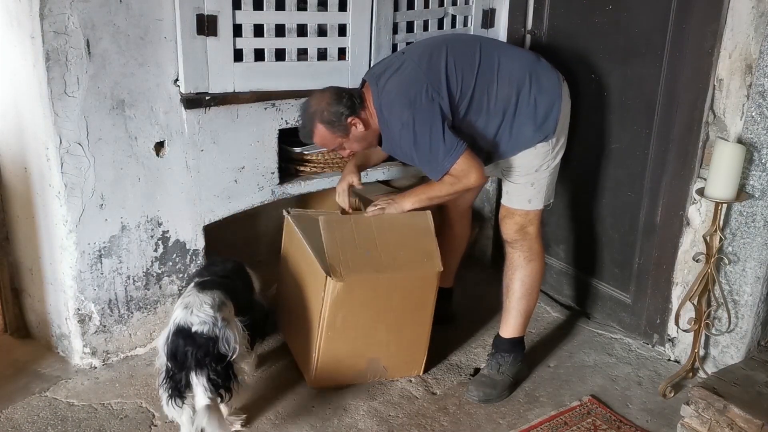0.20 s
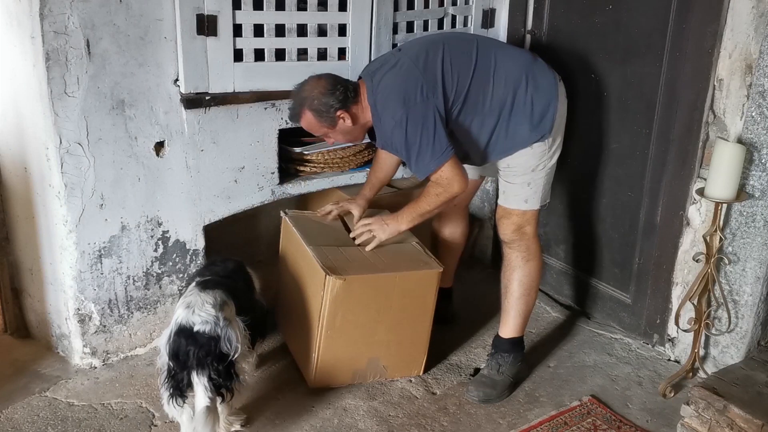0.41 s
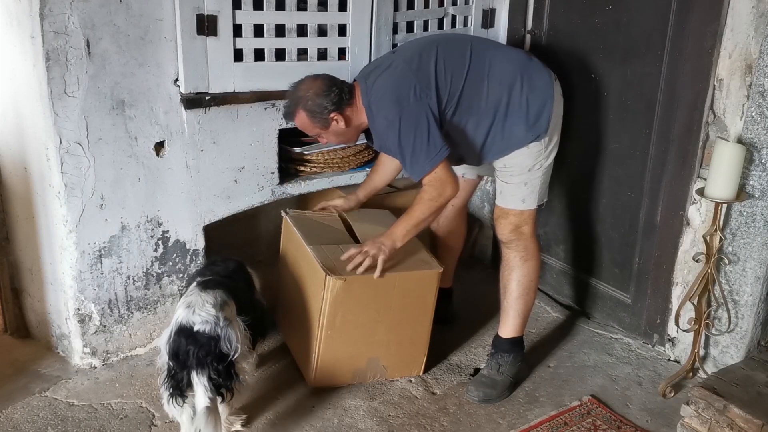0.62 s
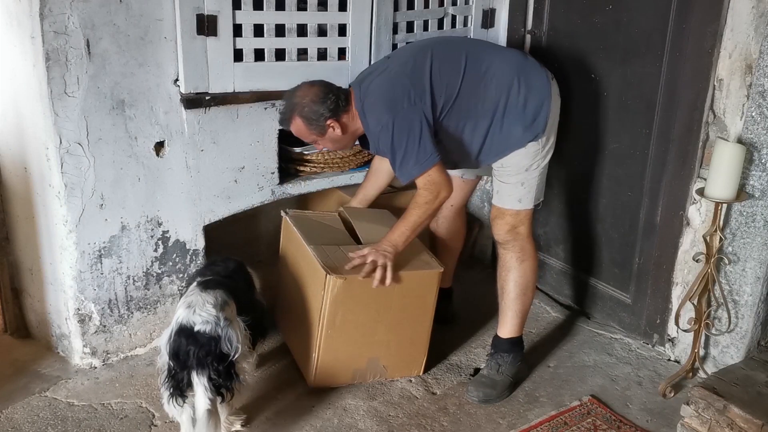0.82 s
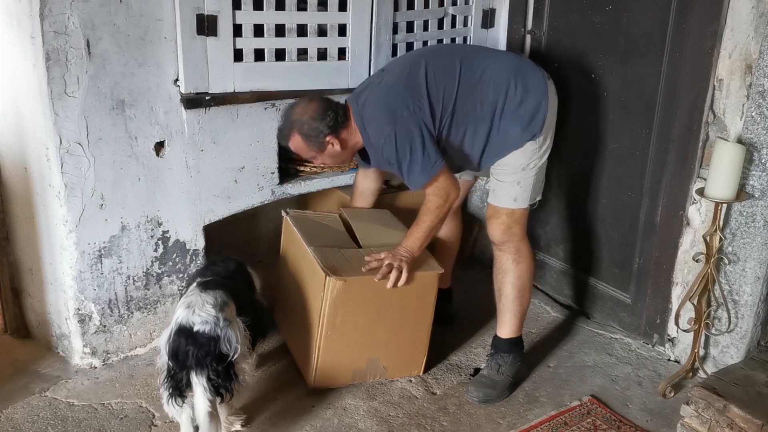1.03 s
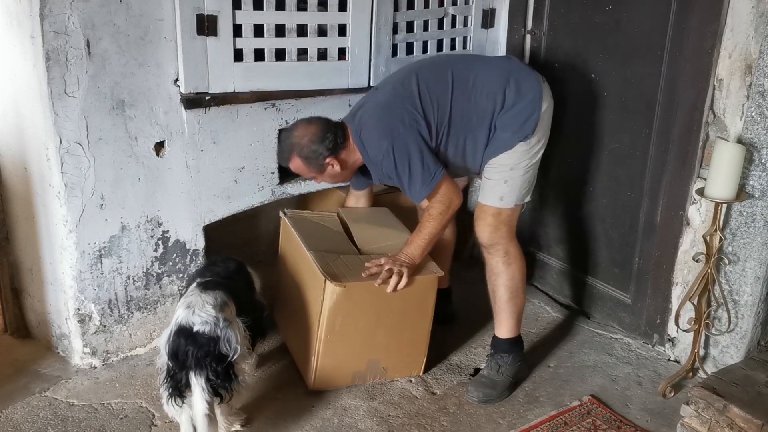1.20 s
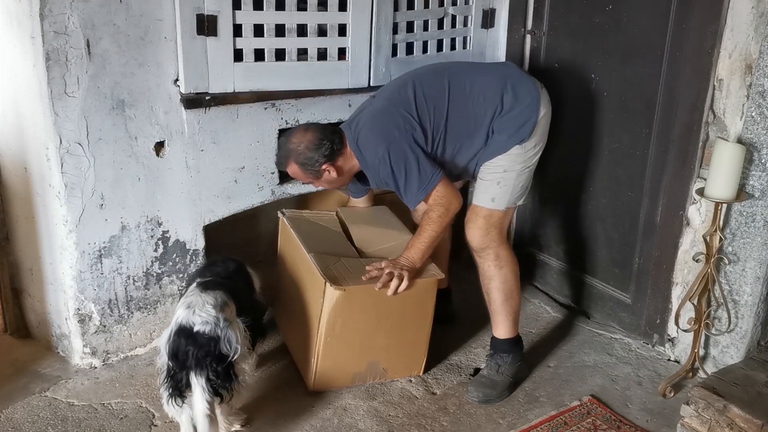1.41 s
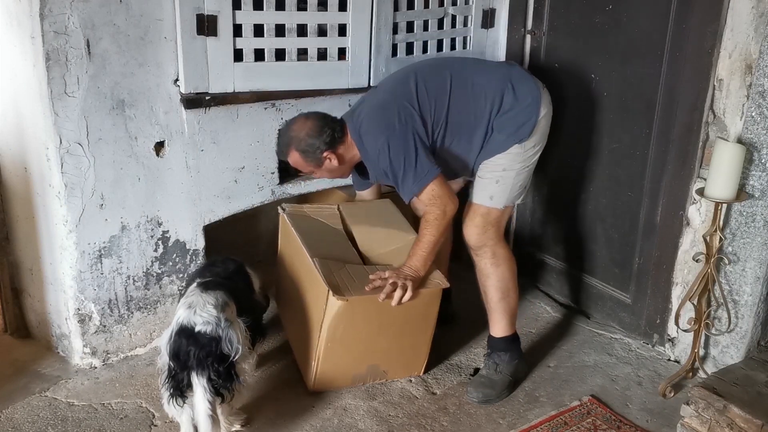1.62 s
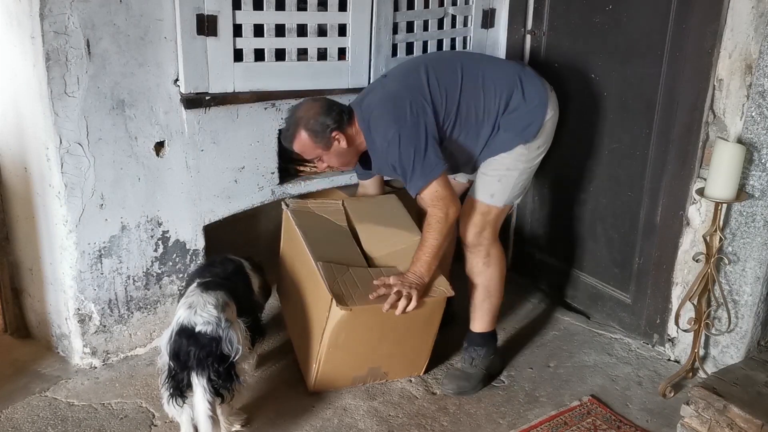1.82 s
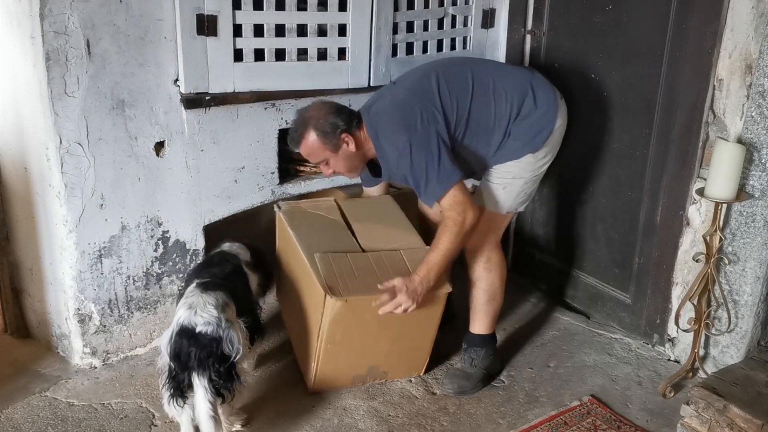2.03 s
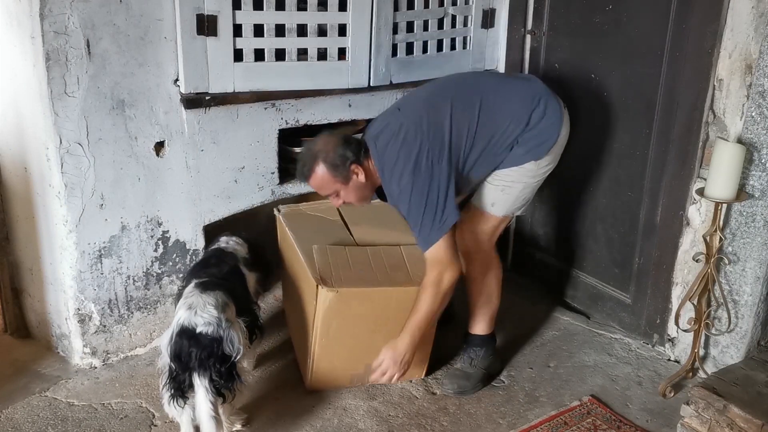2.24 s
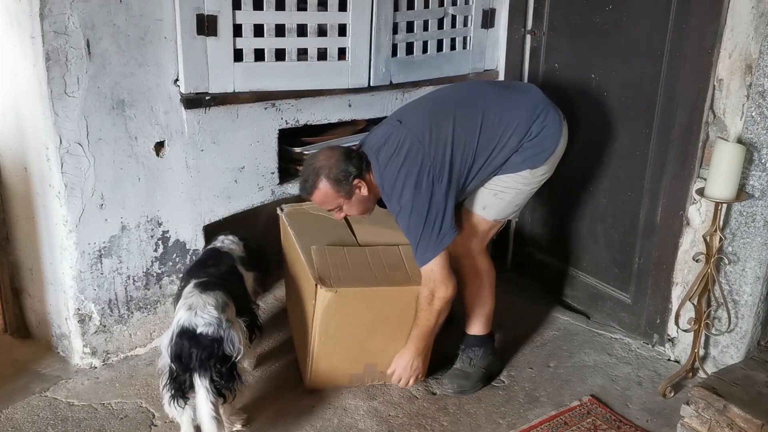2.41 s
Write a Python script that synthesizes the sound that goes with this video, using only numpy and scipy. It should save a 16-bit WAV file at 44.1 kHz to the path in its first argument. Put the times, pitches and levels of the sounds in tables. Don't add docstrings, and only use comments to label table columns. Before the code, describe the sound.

Large empty cardboard box handled close up in a stone-walled room: quick gritty rubs, a strong hollow flap thump, a second lower thump, then longer dry strokes with crisp snaps over faint low room tone.

```python
import sys
import numpy as np
from scipy import signal
from scipy.io import wavfile

SR = 44100
rng = np.random.default_rng(int(sys.argv[2]) if len(sys.argv) > 2 else 0)


def waveform_to_disk(signal):
    frames = np.transpose(np.atleast_2d(signal))
    scaled = np.clip(frames, -1, 1) * 32767
    samples = np.round(scaled).astype(np.int16)
    wavfile.write(sys.argv[1], SR, samples)


def nominal_scale(level):
    x = np.asarray(level, float) / 20
    return 10 ** x


N = 112455


def stroke_controls():
    # start_s, length_s, level_db, brightness_db, drumming_db
    strokes = [(0.127, .04, -71.5, 3, 11.5), (0.158, .04, -71, -7, 26.5), (0.189, 0.032, -51, 6.5, 5.5),
               (.205, .04, -48.5, 6.5, 1.5), (0.237, 0.048, -44, 5.5, -5.5), (0.307, 0.03, -57.5, 2.5, 21),
               (0.353, 0.034, -58, 2, 13.5), (0.493, 0.015, -53.5, 1.5, 7.5), (0.522, 0.032, -63, 17.5, 13),
               (0.578, 0.066, -60, 1, 18), (0.697, 0.052, -59.5, 8.5, 4), (0.817, .14, -58.5, 8.5, -8),
               (1.065, 0.087, -52.5, 5, 4), (1.151, 0.11, -54, 3, -3.5), (1.329, 0.11, -54.5, -2, -0.5),
               (1.432, 0.11, -55.5, 1, 4), (1.517, 0.097, -56.5, 1, -1), (1.705, 0.0092, -57, -0.5, 1.5),
               (1.726, 0.14, -53.5, -2.5, -6.5), (1.83, 0.039, -53, 0, -2), (1.88, 0.099, -57, -2.5, -1),
               (2.189, 0.059, -48.5, 3.5, -2), (2.278, 0.095, -57.5, 0.5, -1.5),
               (2.326, 0.028, -51, 1.5, -5.5), (2.441, 0.18, -54, 0.5, -5)]
    # start_s, length_s, level_db, brightness_db, drumming_db
    brushes = [
        (.41, 0.04, -65, -1, 4),
        (.66, 0.093, -62, 0.5, 12),
        (.78, 0.12, -62, 6, 8),
        (1.002, 0.16, -66, 6.5, 8.5),
        (1.325, 0.016, -66, -6, 7),
        (1.64, 0.11, -68.5, 2.5, 10.5),
        (2.05, 0.01, -56.5, -5, -1),
        (2.085, 0.125, -50.5, 0.5, -2),
        (2.38, 0.041, -57.5, -2.5, -3),
    ]
    stroke_attack_db_per_s, brush_attack_db_per_s = 1296, 418
    sag_db_per_s, release_db_per_s = 9, 198
    t = np.arange(N) / SR
    power = []
    for rows, attack in ((strokes, stroke_attack_db_per_s), (brushes, brush_attack_db_per_s)):
        for start_s, length_s, level_db, _, _ in rows:
            age = t - start_s
            rise_db = np.minimum(attack * (age - 0.02), 0)
            sag_db = sag_db_per_s * np.maximum(age, 0)
            release_db = release_db_per_s * np.maximum(age - length_s, 0)
            power.append(nominal_scale(2 * (level_db + rise_db - sag_db - release_db)))
    power = np.array(power) + 1e-30
    total = power.sum(axis=0)
    rows = np.array(strokes + brushes)
    bright_db = rows[:, 3] @ power / total
    drum_db = rows[:, 4] @ power / total
    return np.sqrt(total), bright_db, drum_db


def grit():
    catches_per_s, spread_db = 7000, 2.5
    shape = (2, 2, N)
    sizes = nominal_scale(spread_db * np.minimum(rng.exponential(1, shape), 5))
    signs = rng.choice([-1, 1], shape)
    return rms_one(sizes * signs * (rng.random(shape) < catches_per_s / SR))


def friction(gain, bright_db):
    # freq_hz, density_db_per_hz
    grit_spectrum = [(300, -3.5), (700, -0.5), (1100, -4), (2200, -2.5), (4800, -8), (6500, -12.5),
                     (11000, -18.5), (15500, -23)]
    pivot_hz, tilt_share, left_db = 2880, 0.58, -1.0
    parts = list(bands(grit(), grit_spectrum, 305.0, patchy_db=1.1))
    scale = np.sqrt(np.mean(sum(part for _, part in parts) ** 2))
    rub = 0
    for hz, part in parts:
        rub = rub + part * nominal_scale(tilt_share * bright_db * np.log2(hz / pivot_hz))
    return balance(left_db) * gain / scale * rub


def box(gain, drum_db):
    # peak_s, peak_db, pitch_hz, swell_s
    thumps = [(0.19, -52.5, 249, 0.022), (0.233, -44.5, 220, 0.013), (0.224, -52, 65, 0.008),
              (.265, -44.5, 338, 0.026), (.298, -43, 185, 0.0058), (0.33, -54, 66, 0.0098),
              (0.39, -51.5, 215, 0.024), (0.43, -68, 59.2, 0.0068), (0.53, -50.5, 73, 0.017),
              (0.72, -48, 168, 0.014), (0.63, -33, 242.5, 0.013), (0.65, -28.5, 157.3, 0.012),
              (.678, -40, 217, 0.0092), (0.647, -38, 76, 0.01), (0.65, -31, 318, 0.0031),
              (0.705, -40, 66, 0.0084), (0.744, -42.5, 170.7, 0.025), (0.79, -52, 82.6, 0.034),
              (.858, -44, 66, 0.017), (0.85, -44.5, 162, 0.0087), (2.325, -53, 59, 0.016),
              (1.086, -47.5, 688, 0.0084), (.64, -46, 587, .01), (1.095, -46, 40, .012),
              (1.121, -48, 96, 0.011), (1.153, -43.5, 88, 0.02), (.95, -52.5, 61, 0.015),
              (2.03, -55.5, 79, .02), (1.42, -55, 130, 0.019), (.2, -56, 68, .015),
              (.598, -43.5, 170, 0.0093), (2.243, -48, 48, .01), (2.15, -53, 49, .025),
              (2.243, -49, 190, .006), (0.68, -52, 97, .008), (1.208, -50, 120, 0.0068),
              (1.424, -49.5, 47, 0.028), (1.49, -49, 84, 0.0048), (1.764, -55.5, 58, 0.018),
              (2.24, -60, 200, 0.018), (2.266, -42, 51, 0.0073), (0.71, -44, 215, 0.026)]
    # peak_s, peak_db, pitch_hz, swell_s
    dents = [
        (1.0795, -35, 118, 0.0039),
        (1.0974, -31.5, 94, 0.0049),
    ]
    # freq_hz, level_db, t60_s
    modes = [(45.3, -2, 0.12), (77.6, -6.5, 0.37), (116, -20, 0.3), (147, -5, 0.12), (160.2, -2, 0.14),
             (211.4, -4, 0.06), (233.4, -4.5, 0.088), (256, -1, 0.19), (313, -3.5, 0.052),
             (344, -7.5, 0.16), (410.4, -10.5, 0.069), (568, -12.5, 0.08), (670, -9, 0.036),
             (824, -19.5, 0.024), (1206, -13, 0.016)]
    fall_per_swell, flex_to_ring_db, stroke_to_ring_db = 1.36, -57.5, -39
    t, flex = np.arange(N) / SR, np.zeros(N)
    for sign, rows in ((1, thumps), (-1, dents)):
        for peak_s, peak_db, hz, swell_s in rows:
            width_s = np.where(t < peak_s, swell_s, fall_per_swell * swell_s)
            bulge = np.exp(-((t - peak_s) / width_s) ** 2)
            flex += sign * nominal_scale(peak_db) * bulge * np.cos(2 * np.pi * hz * (t - peak_s))
    out = flex.copy()
    for hz, level_db, t60_s in modes:
        drumming = rng.standard_normal(N) * gain * nominal_scale(drum_db + stroke_to_ring_db) / np.sqrt(t60_s)
        out += nominal_scale(level_db) * ring(drumming + nominal_scale(flex_to_ring_db) * flex, hz, t60_s)
    return signal.sosfilt(signal.butter(2, 1500, fs=SR, output="sos"), out)


def scuffs():
    # start_s, length_s, level_db, centre_hz, sharpness_q
    scuff_rows = [(0.364, 0.012, -52, 696, 1.3), (0.369, 0.013, -64, 1180, 4.7),
                  (0.382, 0.053, -62, 750, 1.9), (0.507, 0.015, -56.5, 980, 1.7),
                  (0.53, 0.011, -53.5, 730, 2.5), (0.576, .012, -58, 720, 3.3),
                  (.606, 0.022, -51, 430, 2.7), (0.61, 0.014, -54, 635, 4.1), (.645, .018, -56, 520, 3.5),
                  (.682, .03, -57.5, 540, 2.9), (0.818, 0.013, -60, 1220, 2),
                  (0.834, .025, -61.5, 1380, 1.5), (0.837, 0.011, -61, 660, 2.4),
                  (0.898, 0.041, -69.5, 1390, 3.4), (1.078, 0.016, -57, 1240, 3.0),
                  (1.091, 0.013, -53, 368, 2.5), (1.099, .009, -53, 700, 2.7),
                  (1.1, 0.029, -63.5, 1020, 5.3), (1.112, 0.038, -58, 373, 1.4), (1.14, .01, -61, 690, 3.5),
                  (1.16, 0.018, -55.5, 637, 3.5), (1.352, 0.014, -61, 686, 4.2),
                  (1.73, 0.011, -59.5, 1800, 1.1), (2.084, 0.021, -57.5, 3200, 1),
                  (2.119, 0.055, -54, 2690, 1.4), (2.347, .012, -61, 2600, 1.0),
                  (2.388, 0.036, -59.5, 2210, 1.8), (2.513, 0.0035, -63, 7750, 3.7),
                  (2.523, 0.0071, -59, 8000, 5.0)]
    catches_per_s, attack_s, fall_s = 1500, 0.0015, 0.004
    t, out = np.arange(N) / SR, np.zeros(N)
    large = nominal_scale(2.1 * rng.exponential(1, N)) * (rng.random(N) < catches_per_s / SR)
    catches = rng.standard_normal(N) * (0.4 + large)
    for start_s, length_s, level_db, hz, sharpness_q in scuff_rows:
        b, a = signal.iirpeak(hz, sharpness_q, fs=SR)
        rise = np.clip((t - start_s) / attack_s, 0, 1)
        fall = np.exp(-np.maximum(t - start_s - length_s, 0) / fall_s)
        rasp = signal.lfilter(b, a, signal.lfilter(b, a, catches))
        out += nominal_scale(level_db) * rise * fall * rms_one(rasp)
    return out


def snaps(gain):
    # peak_s, peak_db, ring_hz
    snap_rows = [(1.7305, -44, 6500), (1.7305, -45, 10500), (1.9047, -38, 15500), (.5095, -47, 1200),
                 (.84, -49, 2200), (1.8255, -42, 3000), (1.8572, -37, 2500), (1.8572, -41, 7000),
                 (1.9047, -35, 7000), (1.9047, -33, 11500), (2.342, -36, 2000), (2.342, -35, 3000),
                 (2.342, -36, 4200), (2.342, -40, 7900), (2.3508, -39, 3800), (2.3508, -37, 2300),
                 (2.3485, -41, 1800), (2.392, -44, 2000), (2.509, -44, 6700), (2.5207, -40, 7500),
                 (2.549, -38, 2000)]
    ring_cycles, lift_db = 5.0, 6
    crackle_per_s, crackle_db = 200, 9
    out = np.zeros(N)
    for peak_s, peak_db, hz in snap_rows:
        click = np.zeros(N)
        click[int(peak_s * SR)] = nominal_scale(peak_db + lift_db)
        out += signal.lfilter(*signal.iirpeak(hz, 1, fs=SR), ring(click, hz, ring_cycles / hz))
    ticks = rng.standard_normal(N) * (rng.random(N) < crackle_per_s / SR)
    band = signal.butter(1, [1500, 7000], "band", fs=SR, output="sos")
    return out + signal.sosfilt(band, gain * nominal_scale(crackle_db) * ticks)


def room(x):
    t60_s, wall_cut_hz = 0.76, 6000
    out, dull = np.zeros((2, N)), np.exp(-2 * np.pi * wall_cut_hz / SR)
    lags = (rng.uniform(0.011, 0.04, 16) * SR).astype(int)
    for k, lag in enumerate(lags):
        loop, gain, state = x.copy(), nominal_scale(-60 * lag / SR / t60_s), [0.]
        for i in range(lag, N, lag):
            back, state = signal.lfilter([gain * (1 - dull)], [1, -dull], loop[i - lag:i], zi=state)
            loop[i:i + lag] += back[:N - i]
        out[k % 2] += (loop - x) * (-1) ** (k // 2)
    return out


def room_tone():
    # freq_hz, density_db_per_hz
    tone_spectrum = [(25, -1.5), (53, -13.5), (110, -8.5), (270, -12.5), (500, -25.5), (3500, -38),
                     (7000, -49), (13000, -58.5)]
    noise = rng.standard_normal((2, 2, N))
    return rms_one(sum(part for _, part in bands(noise, tone_spectrum, 23.9, patchy_db=2.0)))


def bands(sources, spectrum, low_hz, patchy_db):
    # freq_hz, correlation
    likeness = [(100, 0.69), (350, 0.96), (700, 0.77), (1500, 0.3), (4000, 0.12)]
    edges_hz = low_hz * 2 ** np.arange(0, np.log2(16000 / low_hz) + 0.5, 0.5)
    edges_hz = np.minimum(edges_hz, 17000)
    warm_up = SR // 4
    for k, (low, high) in enumerate(zip(edges_hz, edges_hz[1:])):
        sos = signal.butter(2, [low, high], "band", fs=SR, output="sos")
        looped = np.tile(sources[k % 2], 2)[:, N - warm_up:]
        mid, side = signal.sosfilt(sos, looped)[:, warm_up:]
        hz = np.sqrt(low * high)
        alike = np.clip(at_hz(likeness, hz), -1, 1)
        gain = nominal_scale(at_hz(spectrum, hz) + patchy_db * drift(36.5))
        stereo = np.sqrt(1 + alike) * mid + np.sqrt(1 - alike) * side * [[1], [-1]]
        yield hz, gain * stereo


def ring(clicks, hz, t60_s):
    r, w = nominal_scale(-60 / (t60_s * SR)), 2 * np.pi * hz / SR
    return signal.lfilter([0, np.sin(w)], [1, -2 * r * np.cos(w), r * r], clicks + 1e-18)


def drift(rate_hz):
    r = np.exp(-2 * np.pi * rate_hz * 40 / SR)
    noise = rng.standard_normal(N // 40 + 2002)
    slow = signal.lfilter([1], [1, -2 * r, r * r], noise)[2000:]
    return np.interp(np.arange(N) / 40, np.arange(len(slow)), rms_one(slow))


def at_hz(points, hz):
    table_hz, values = np.transpose(points)
    return np.interp(np.log(hz), np.log(table_hz), values)


def rms_one(x):
    return x / np.sqrt(np.mean(x ** 2) + 1e-20)


def balance(left_db):
    return nominal_scale(np.array([[0.5], [-0.5]]) * left_db)


def scene():
    room_db, tone_db, left_db = -14, -64, 1.53
    gain, bright_db, drum_db = stroke_controls()
    rub = friction(gain, bright_db)
    body = box(gain, drum_db)
    edge = scuffs()
    ticks = snaps(gain)
    wet = room(rub.mean(axis=0) + nominal_scale(-16) * body + nominal_scale(-2.5) * edge + ticks)
    mix = rub + body + edge + ticks + nominal_scale(room_db) * wet + nominal_scale(tone_db) * room_tone()
    return mix * balance(left_db)


def low_pass(x):
    return signal.sosfilt(signal.butter(12, 16460, fs=SR, output="sos"), x)


def record(dry):
    # centre_hz, width_hz, lift_db
    ports = [
        [(10530, 1360, 14.5), (5160, 1100, 4.5)],
        [(7880, 625, 14.5), (4900, 1440, 4.5)],
    ]
    bottom_hz, top_hz, right_lag_samples = 30.4, 16050, 2
    out = dry.copy()
    for k, port in enumerate(ports):
        for hz, width_hz, lift_db in port:
            b, a = signal.iirpeak(hz, hz / width_hz, fs=SR)
            out[k] += (nominal_scale(lift_db) - 1) * signal.lfilter(b, a, out[k])
    out[1] = np.pad(out[1], (right_lag_samples, 0))[:N]
    out = signal.sosfilt(signal.butter(2, bottom_hz, "high", fs=SR, output="sos"), out)
    out = signal.sosfilt(signal.cheby2(18, 60, top_hz, fs=SR, output="sos"), out)
    return low_pass(out)


dry = scene()
out = record(dry)
waveform_to_disk(out)
```